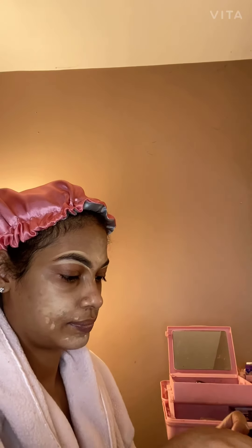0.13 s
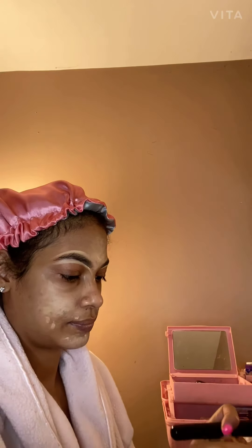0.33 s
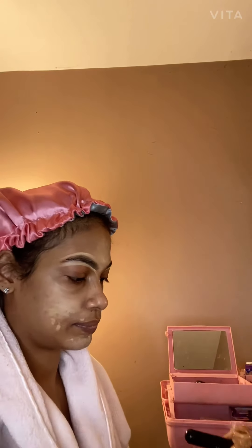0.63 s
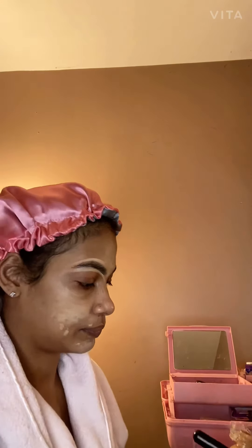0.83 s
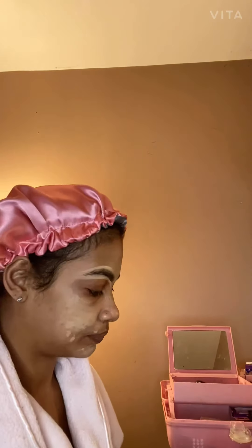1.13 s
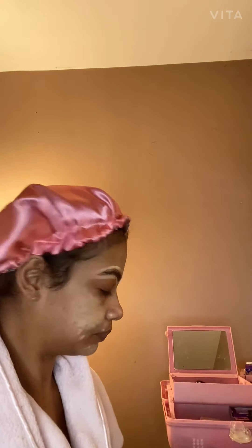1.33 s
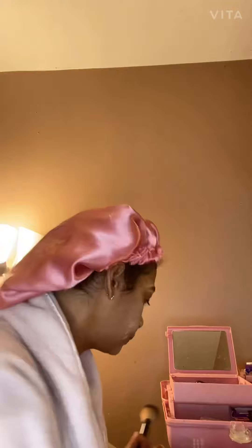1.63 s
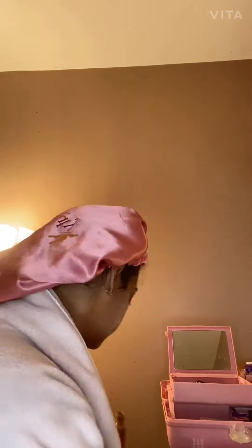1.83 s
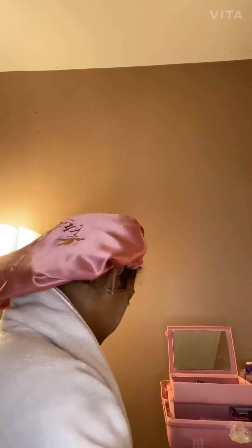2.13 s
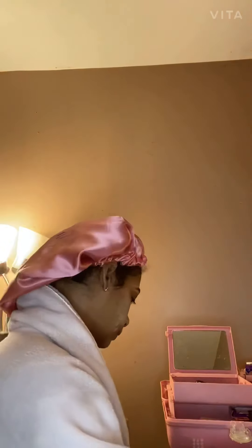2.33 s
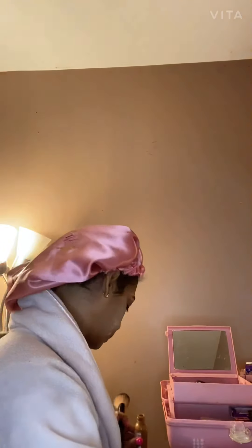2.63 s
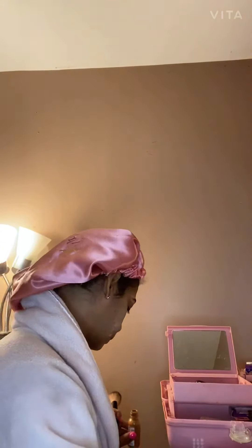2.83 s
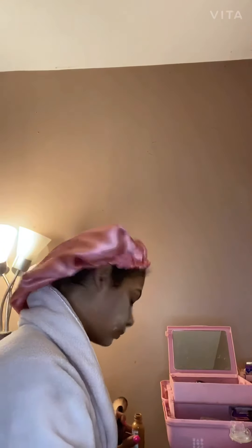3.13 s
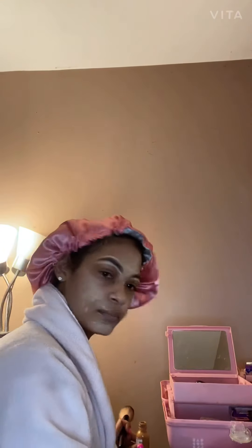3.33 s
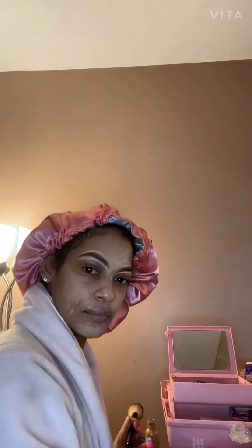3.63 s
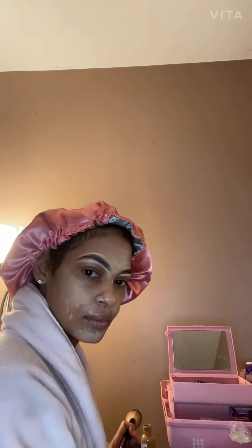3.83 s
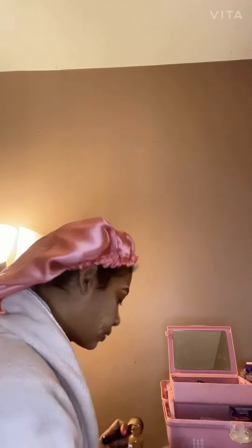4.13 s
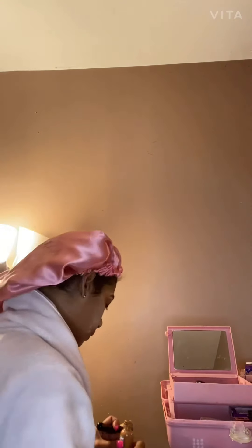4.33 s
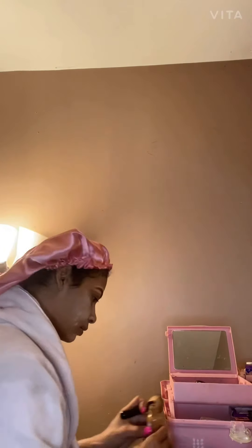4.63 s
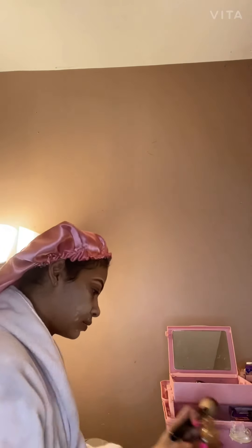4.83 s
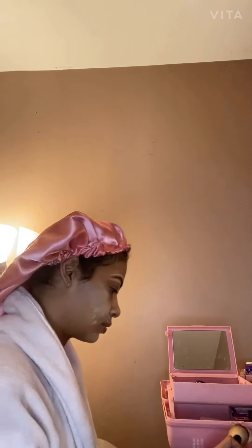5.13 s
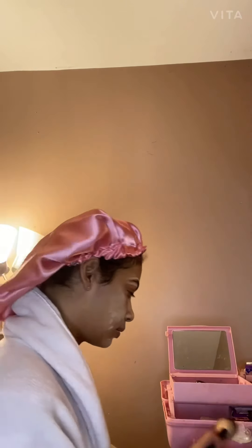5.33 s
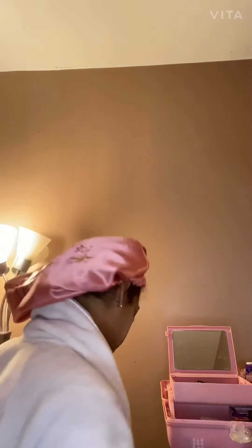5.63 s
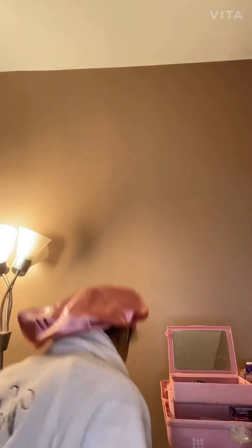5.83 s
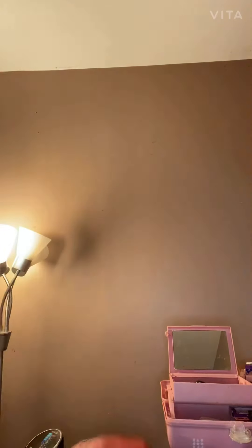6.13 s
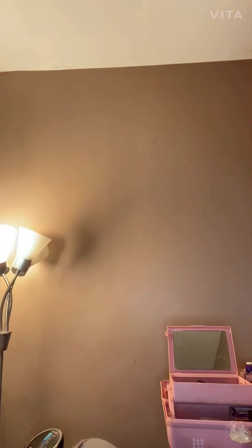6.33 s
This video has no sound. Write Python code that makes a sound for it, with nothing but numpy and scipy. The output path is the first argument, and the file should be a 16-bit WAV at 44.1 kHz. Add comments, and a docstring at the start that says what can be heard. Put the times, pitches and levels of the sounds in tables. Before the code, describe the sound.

Close hard clicks of makeup containers on a dressing table, a loud triple knock, smaller rattles, a later clack, then quiet hum and faint hiss.

```python
"""A low house hum and faint hiss come first; then small plastic pots, caps and brushes click on a dressing table.
Hum and hiss are filtered noise. Each blow is a chattering force driving decaying modes of pot and table.
Small pieces clink on a pitch, a small bare room answers with decaying noise,
and a towelling robe rustles as grainy noise that swells and fades with each stroke."""
import sys
import numpy as np
from scipy import signal
from scipy.fft import rfft, irfft, next_fast_len
from scipy.io import wavfile
from scipy.ndimage import uniform_filter1d

SR = 44100
rng = np.random.default_rng(int(sys.argv[2]) if len(sys.argv) > 2 else 0)


def put_to_file(sound):
    """Save the sound as 16-bit audio at rate SR, in the file named by the first command-line argument."""
    columns = np.atleast_2d(sound).T  # one column per channel
    safe = np.clip(columns, -1, 1)
    whole_steps = np.round(safe * 32767)
    wavfile.write(sys.argv[1], SR, whole_steps.astype(np.int16))


N = 286398  # length in samples

# Room resonances in the house rumble: f/Hz, width/Hz, level/dB
HUM_MODES = [(56.7, 17, 0.5), (106.8, 7.7, -7.5), (132, 38, -5), (189.35, 22, -5)]
# Course of the rumble: t/s, deep level/dB, upper level/dB
HUM_LEVEL = [(0.0, -67, -80), (0.45, -54.5, -66.5), (1.4, -55.5, -57), (2.26, -52, -61.5),
             (3.399, -58.5, -52.5), (4.1, -48.5, -54), (5.47, -56.5, -58.5), (6.05, -48.5, -59),
             (6.44, -62, -64.5)]
DEEP_BELOW_HZ = 85

# Spectrum of air and electronics: f/Hz, level/dB per Hz
HISS_SPECTRUM = [(18, -32.5), (30, -5.5), (49, -7.5), (76, 1), (181, -14), (363, -30), (563, -38),
                 (728, -40.5), (1790, -46), (3230, -49.5), (7550, -52.5), (11100, -58.5), (14000, -74)]
HISS_DB = -77.5  # part common to both ports, 400 Hz to 13 kHz

# Blows: t/s, click level/dB; then against the click: table thud level/dB, hollow knock level/dB,
# snap level/dB, bright crack level/dB; chatter level/dB against the first contact, size (middling pot = 1)
BLOWS = [(0.9726, -49, -8, 6.5, -5, -15, -5, 1.04), (1.0056, -56, 5.5, 18, 3.5, -15, -10, 0.96),
         (1.027, -47.5, 0.5, -6, -27, -23, -6, 1.01), (1.1717, -15.5, 1.5, 0, 4.5, 5.5, -6, 1.1),
         (1.1917, -16, -13, -11, 2, -3, 2, 0.98), (1.2174, -14.5, -14, -10.5, 3.5, 5, -7, 1.01),
         (1.5474, -30, 5, -1, -9.5, -10.5, -12.5, 1.01), (1.7141, -20, -23.5, -6, 9, 17.5, -10, 1.004),
         (1.8552, -23.5, -22.5, -3, -2.5, 0.5, -8.5, 1.08), (2.0212, -21, -22, -11, 8, 7.5, -14.5, 0.94),
         (2.1237, -33, -17.5, -1.5, -10, -2.5, -18, 1.02), (2.2179, -31, -18.5, -5, -12, -4.5, -11, 1.09),
         (2.3042, -38.5, -25, -19, 10, 8.5, -12, 0.9), (2.3784, -35, -20.5, -9, 7.5, 3, -18, 0.66),
         (2.395, -36, -13.5, -10.5, 6.5, 4.5, -9, .9), (2.43, -40, -27, -5.5, 2, -7, -11, 1.14),
         (2.4796, -40, -14.5, -4, -13, -2.5, -6, 1.08), (2.5377, -36.5, -31, -9, 8.5, -0.5, -11, 1.04),
         (2.583, -40, -14, -7, 10, 4.5, -14, 1.04), (2.6114, -41.5, -7, -3.5, 6.5, -5, -15, 1.22),
         (2.6798, -50, -7.5, 0, 5.5, -3, -5, 1.1), (2.8148, -49.5, -5.5, -3, -2, -16.5, -9, 1.1),
         (2.8347, -51.5, -3.5, -1.5, 0.5, -13, -1, 0.81), (2.8669, -52, -19, -6.5, 5.5, -5.5, -6, 1.1),
         (3.0043, -48, -26, 3, -3, -13.5, 4, 0.96), (3.2005, -49, -8, -23.5, -0.5, -5.5, -13, 0.96),
         (3.2212, -36.5, -10, 2, -7.5, -10.5, -11, .95), (3.382, -49.5, -6.5, 7, -8, -26, -3, 1.1),
         (3.4026, -26.5, -43, -3, -2.5, -4, -11, 1.06), (3.8121, -68.5, 19.5, 13, -17, -22, -10, 0.94),
         (4.156, -62, 15, 10, -7.5, -19, -12, 1.37), (4.2398, -52.5, -3.5, -17, 0.5, -6.5, -14, 1.01),
         (4.453, -71.5, 23.5, 18, 3, -13, -1, 1.3), (4.9858, -19.5, -27, -8.5, -3, -24.5, -5.5, 0.94),
         (5.0538, -31.5, -21, -7, 0, -7, -9.5, 1.07), (5.0655, -37, -31.5, -3.5, 8.5, -19, -19, 1.17),
         (5.0742, -29.5, -16.5, -13, -4, -10, -15, 0.9), (5.0813, -30.5, -23.5, -14, -28, -16, -14.5, 0.99),
         (5.23, -67.5, -4.5, -5, -6, 2, -9, 1.2)]
# Modes of the table top: f/Hz, level/dB, t60/s
TABLE_MODES = [(57.46, -10, 0.34), (115, -14, 0.08), (188, 1, .05), (262, -3, .08), (330, -5, .05),
               (409.5, -6, 0.024)]
# Cavity modes of a middling pot: f/Hz, level/dB, t60/s
CAVITY_MODES = [(427, -7, 0.0084), (668, -5, 0.023), (829.6, 0.5, 0.012), (1012.4, 1, 0.011)]
# Thin-wall modes of a middling pot: f/Hz, level/dB, t60/s
WALL_MODES = [(1490, -2, 0.013), (2000, -3, 0.06), (2300, 1, 0.031), (3030, -2.5, 0.006), (3800, 0, 0.049),
              (4336, -1, 0.0065), (4975, 0, 0.023), (6286, 4.5, 0.017), (8080, 4.5, 0.015)]
WALLS_DB = -9.5  # rms of the walls against the rest of the pot
# Bands that softer, harder and hardest contacts reach
CLICK_HZ, SNAP_HZ, CRACK_HZ = (1286, 2740), (2640, 5380), (5500, 10780)
CONTACT_S, CHATTER_S = 0.0011, 0.025  # chatter: time constant of build-up, time to fall 60 dB
GRIT_DB = 5.9  # random spread of the tiny contacts
TABLE_LAG_S, TABLE_PUSH_S = 0.005, 0.00053  # the table's force: delay, decay time constant
TABLE_RADIATES_HZ = (130, 900)  # the table top is too small to send out deep bass
POTS_PAN_DB, CLINK_PAN_DB = -1.5, 1.5  # left minus right

# Part of the direct sound that differs between the ports: f/Hz, level/dB
ASIDE = [(200, -22.5), (500, -7), (1000, -9), (2000, -6), (4000, -3.5), (8000, -3)]

# Room decay: f/Hz, t60/s, level/dB, left-right likeness (0-1)
ROOM_DECAY = [(150, 0.085, -1.5, 1), (296, 0.36, -4, 0.97), (560, 0.2, 4, 1), (1190, .26, -2, 0.11),
              (2680, 0.25, -0.5, 0.3), (7100, 0.23, -1.5, 0.77), (12000, 0.2, -1.5, 0.78)]
ROOM_DB, ROOM_GAP_S, ROOM_PAN_DB = 1, 0.0043, -2
EARLY_DB, EARLY_S = 1, 0.0062  # table top, mirror and nearby pots throw back a strong first cluster
LATE_DB, LATE_T60_S, LATE_TOP_HZ = -23, 1, 3000  # slower, duller tail from the space beyond the door

# Clinks of small hard pieces: t/s, peak level/dB, f/Hz, overtone level/dB
CLINKS = [(1.98, -28.5, 1432, -6), (2.303, -33.5, 2360, -9), (2.509, -34.5, 1346, -15),
          (2.524, -35, 1270, -14), (5.066, -33.5, 1890, -12.5)]
# Modes of a small plastic piece: f as a multiple of the clink pitch, level/dB, t60/s
PLASTIC_MODES = [(1.001, -2.5, 0.02), (1.45, -3.5, 0.022), (1.78, -2.5, 0.03), (2.45, -2.5, .025),
                 (2.72, -8, .03), (4.8, -1.5, .015)]
CLINK_ROOM_DB = -2.5  # small pieces excite the room less than the pots do

# Strokes of robe and fingers: loudest t/s, level/dB, treble level/dB against it,
# swell/s, hold/s, fade/s (the body's swell and fade each span 20 dB)
STROKES = [(2.735, -63.5, -3.5, .1, .04, 0.12), (2.83, -55.5, -11, 0.064, 0.026, 0.066),
           (3.184, -64.5, 1, 0.23, 0.011, 0.11), (3.359, -61.5, 3.5, .2, 0.033, .05),
           (3.711, -59, 2.5, 0.032, .01, 0.14), (3.978, -62.5, 0.5, 0.094, 0.017, 0.24),
           (4.165, -69.5, -8, 0.028, 0.011, 0.069), (4.246, -63, -3, 0.0099, 0.0087, 0.18),
           (4.572, -60, 2, 0.16, 0.022, 0.14), (4.729, -68.5, -0.5, .2, 0.033, 0.17),
           (4.974, -65, -8, 0.28, 0.0096, .1), (5.49, -75, -7, .1, .02, 0.25),
           (5.74, -73.5, -2.5, 0.44, .02, 0.35), (6.08, -68, 4, 0.45, 0.38, .3)]
# Fingers squeaking faintly along plastic: start t/s, end t/s, f/Hz, width/Hz, level/dB
RUBS = [(2.743, 2.793, 2300, 400, -60), (5.472, 5.64, 1833, 500, -75)]
SHEEN_STEEPNESS = 1.33  # the treble of a stroke swells and fades this much faster in dB than its body
SHEEN = [(1500, -22.5), (3500, 14), (5500, 9), (9000, 8), (12000, 2.5)]  # f/Hz, level/dB

# Overall tone: f/Hz, level/dB
OVERALL_TONE = [(20, -21), (45, -4.5), (70, 0), (6000, -2), (9000, -9), (11500, -10.5), (12500, -15),
                (13500, -29), (15800, -34)]
STOP_S, TOP_HZ = 6.452, 15850  # onset of silence, steep upper limit
OPPOSITE = np.array([[1], [-1]])  # equal and opposite at left and right


def undb(db):
    """Logarithmic level: 20 dB is a factor of ten in amplitude."""
    return 10 ** (np.asarray(db) / 20)


def unit(x):
    """Effective value: scale to rms 1."""
    return x / np.sqrt(np.mean(x ** 2))


def peak(x):
    """Short-time power: scale so that the loudest 3 ms have rms 1."""
    return x / np.sqrt(uniform_filter1d(x ** 2, size=132).max())


def band(x, lo_hz, hi_hz):
    """Band limitation by a Butterworth filter."""
    return signal.sosfilt(signal.butter(2, [lo_hz, hi_hz], "band", fs=SR, output="sos"), x)


def colour(x, points):
    """Spectral weighting: interpolate (f/Hz, level/dB) points along log frequency."""
    hz, db = np.transpose(points)
    n = next_fast_len(x.shape[-1])
    log_f = np.log(np.maximum(np.arange(n // 2 + 1) * SR / n, 1))
    gain = undb(np.interp(log_f, np.log(hz), db))
    return irfft(rfft(x, n) * gain, n)[..., :x.shape[-1]]


def decay(t, t60):
    """Exponential decay: the amplitude falls 60 dB in t60."""
    return np.exp(-np.log(1000) * t / t60)


def ring(push, modes):
    """Modal superposition: a force drives damped resonators (f/Hz, level/dB, t60/s)."""
    out = 0
    for hz, db, t60 in modes:
        pole = np.exp(2j * np.pi * hz / SR) * decay(1 / SR, t60)
        out = out + undb(db) * signal.lfilter([1], [1, -pole], push).imag
    return out


def resize(modes, size):
    """Geometric similarity: a larger pot has proportionally lower modes."""
    return [(hz / size, db, t60) for hz, db, t60 in modes]


def walk(rate_hz):
    """Slow fluctuation: smoothed random steps with rms 1."""
    k = int(SR / rate_hz)
    steps = np.repeat(rng.standard_normal(N // k + 1), k)
    return unit(uniform_filter1d(uniform_filter1d(steps, k), k)[:N])


def sides(pan_db):
    """Level difference between channels: left and right gains."""
    return undb(np.array([[pan_db], [-pan_db]]) / 2)


def house():
    """Room resonance: low bands of noise swell and wander, the same at both ports."""
    s, deep_db, upper_db = np.transpose(HUM_LEVEL)
    t, rumble = np.arange(N) / SR, 0
    for hz, width_hz, db in HUM_MODES:
        edges = hz - width_hz / 2, hz + width_hz / 2
        tone = unit(band(band(rng.standard_normal(N), *edges), *edges))
        course_db = np.interp(t, s, deep_db if hz < DEEP_BELOW_HZ else upper_db)
        rumble = rumble + tone * undb(db + course_db + 1.5 * walk(3))
    return rumble


def hiss():
    """Stationary noise of air and electronics: a common part plus a part opposite at the two ports."""
    mid, side = colour(rng.standard_normal((2, N)), HISS_SPECTRUM)
    both = mid + 0.9 * band(side, 300, 15000) * OPPOSITE
    return both * undb(HISS_DB) / np.std(band(mid, 400, 13000))


def blows():
    """Impact excitation: chattering contacts drive pot and table; returns direct sound and room drive."""
    near, far, t = np.zeros((2, N)), np.zeros(N), np.arange(8192) / SR
    tap = 1. * (t == 0)
    click, snap, crack = (peak(band(band(tap, *hz), *hz)) for hz in (CLICK_HZ, SNAP_HZ, CRACK_HZ))
    # The table feels only the overall force, so its thud carries no chatter
    table_push = np.maximum(t - TABLE_LAG_S, 0) * np.exp(-t / TABLE_PUSH_S)
    thud = peak(band(ring(table_push, TABLE_MODES), *TABLE_RADIATES_HZ))
    swell = (1 - np.exp(-t / CONTACT_S)) * decay(t, CHATTER_S)
    for s, db, thud_db, knock_db, snap_db, crack_db, chatter_db, size in BLOWS:
        knock = peak(ring(tap, resize(CAVITY_MODES, size)))
        body = click + undb(snap_db) * snap + undb(crack_db) * crack + undb(knock_db) * knock
        walls = ring(body, resize(WALL_MODES, size))
        body = body + undb(WALLS_DB) * walls * np.std(body) / np.std(walls)
        grit, grit_level = rng.standard_normal((2, len(t)))
        push = tap + undb(chatter_db + GRIT_DB * grit_level) * grit * swell
        direct = signal.fftconvolve(body, push)[:len(t)] / np.sqrt(np.sum(push ** 2))
        low = undb(thud_db) * thud
        i = int(s * SR)
        near[:, i:i + len(t)] += undb(db) * (direct * sides(POTS_PAN_DB) + low)
        far[i:i + len(t)] += undb(db) * (body + low)  # many reflections blur the chatter into one blow
    return near, far


def ports(near):
    """Phase quadrature: the ports face apart, so part of the sound is a quarter cycle out of step."""
    quarter = signal.hilbert(near.mean(axis=0), next_fast_len(N)).imag[:N]
    return near - colour(quarter, ASIDE) * OPPOSITE


def room(dry):
    """Diffuse reverberation: dense reflections decay band by band, the bass alike at both ports."""
    t, reply = np.arange(SR) / SR, 0
    hz, t60, db, alike = np.transpose(ROOM_DECAY)
    for f in 90 * 2 ** np.arange(0, 7.6, 0.5):  # half-octave bands
        band_t60, band_db, c = (np.interp(np.log(f), np.log(hz), v) for v in (t60, db, alike))
        mid, side = band(rng.standard_normal((2, SR)), f / 2 ** 0.25, f * 2 ** 0.25)
        late = undb(LATE_DB) / (1 + (f / LATE_TOP_HZ) ** 2) * decay(t, LATE_T60_S)
        fall = decay(t, band_t60) + late
        spread = np.sqrt(1 + c) * mid + np.sqrt(1 - c) * side * OPPOSITE
        pan = sides(ROOM_PAN_DB * min(f / 400, 1))  # weaker in the bass
        reply = reply + undb(band_db) * fall * spread * pan
    reply *= np.clip(t / ROOM_GAP_S - 1, 0, 1)  # the nearest surfaces answer after a short gap
    reply *= 1 + undb(EARLY_DB) * np.exp(-t / EARLY_S)
    reply /= np.sqrt(np.sum(reply ** 2) / 2)
    return undb(ROOM_DB) * signal.fftconvolve(dry[None], reply, axes=1)[:, :N]


def clinks():
    """Free vibration: a tapped small piece rings on its own pitch; returns direct sound and room drive."""
    near, far = np.zeros((2, N)), np.zeros(N)
    tap = 1. * (np.arange(8192) == 0)
    for s, db, hz, over_db in CLINKS:
        # over_db acts on the overtones only, not on the fundamental
        modes = [(hz * k, g + over_db * (k > 1.2), t60) for k, g, t60 in PLASTIC_MODES]
        clink = undb(db) * peak(ring(tap, modes))
        i = int(s * SR)
        near[:, i:i + len(tap)] += clink * sides(CLINK_PAN_DB)
        far[i:i + len(tap)] += undb(CLINK_ROOM_DB) * clink
    return near, far


def rustle():
    """Friction noise: dense fibre slips make grainy noise that swells and fades with each stroke."""
    t, body, treble = np.arange(N) / SR, 0, 0
    for s, db, treble_db, swell_s, hold_s, fade_s in STROKES:
        down_db = 20 * (np.maximum(s - t, 0) / swell_s + np.maximum(t - s - hold_s, 0) / fade_s)
        body = body + undb(db - down_db)
        treble = treble + undb(db + treble_db - SHEEN_STEEPNESS * down_db)
    slips = rng.standard_normal((2, N)) * undb(2.0 * rng.standard_normal(N))
    slips = slips + 0.13 * slips[::-1]  # each port hears some of the other's fibres
    return body * unit(band(slips, 230, 2500)) + treble * unit(colour(slips, SHEEN))


def rubs():
    """Sliding friction: fingers on plastic make narrow bands of noise, the same at both ports."""
    t, squeak = np.arange(N) / SR, 0
    for start_s, end_s, hz, width_hz, db in RUBS:
        envelope = np.clip(np.minimum(t - start_s, end_s - t) / 0.011, 0, 1)
        noise = unit(band(rng.standard_normal(N), hz - width_hz / 2, hz + width_hz / 2))
        squeak = squeak + undb(db) * envelope * noise
    return squeak


def scene():
    """Linear superposition: house, blows and clinks with their echo, rustle and rubs."""
    blow_near, blow_far = blows()
    clink_near, clink_far = clinks()
    struck = ports(blow_near + clink_near) + room(blow_far + clink_far)
    return house() + struck + rustle() + rubs()


def record(dry):
    """Filtering and saturation: a dull overall tone with little above 12 kHz; hiss is added,
    the loudest peaks are rounded, then the sound stops; a steep filter cuts the top."""
    on = np.clip((STOP_S - np.arange(N) / SR) / 0.004, 0, 1)
    heard = 0.9 * np.tanh((colour(dry, OVERALL_TONE) + hiss()) / 0.9) * on
    return signal.sosfilt(signal.ellip(8, 0.2, 70, TOP_HZ, fs=SR, output="sos"), heard)


dry = scene()
out = record(dry)
put_to_file(out)
```